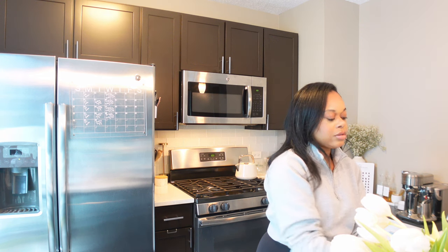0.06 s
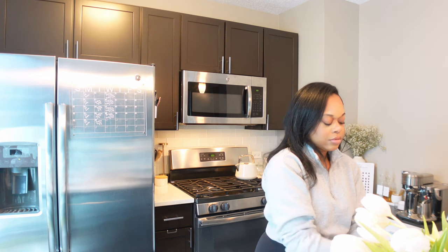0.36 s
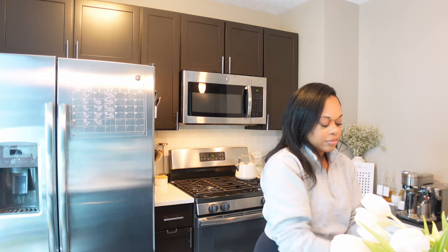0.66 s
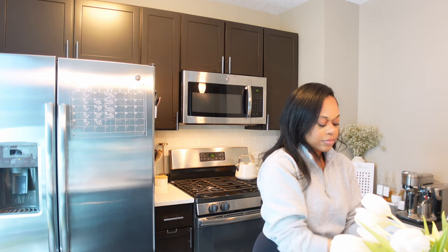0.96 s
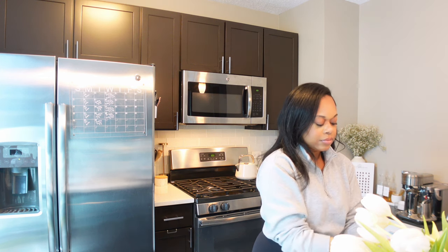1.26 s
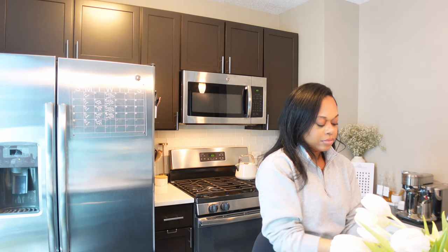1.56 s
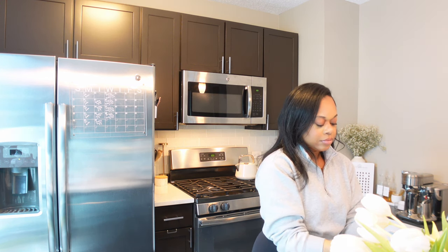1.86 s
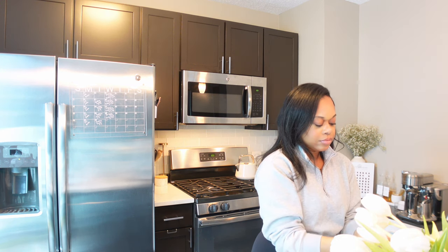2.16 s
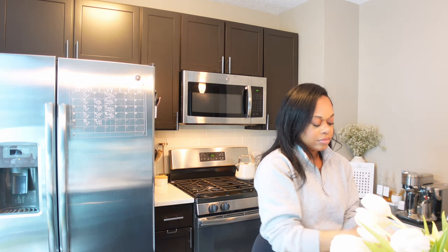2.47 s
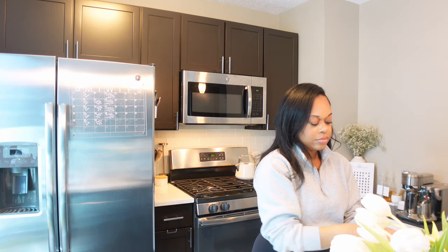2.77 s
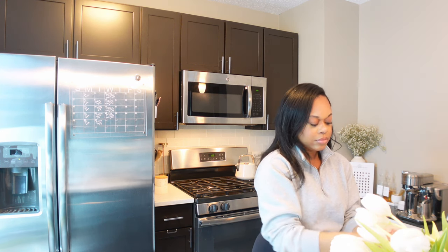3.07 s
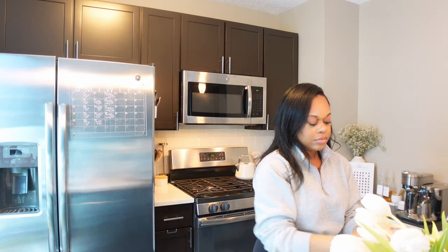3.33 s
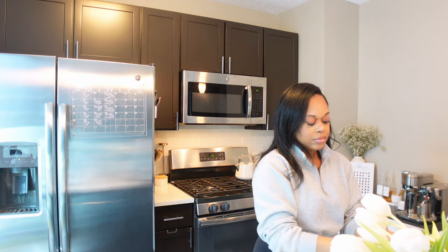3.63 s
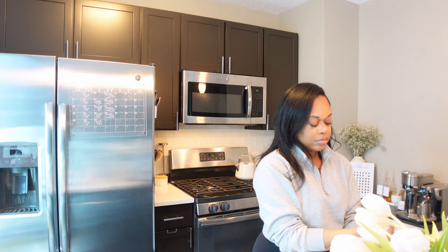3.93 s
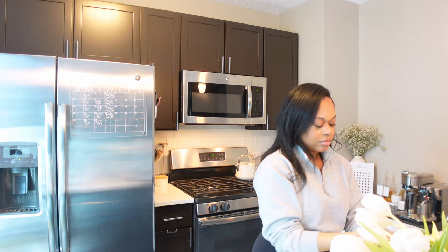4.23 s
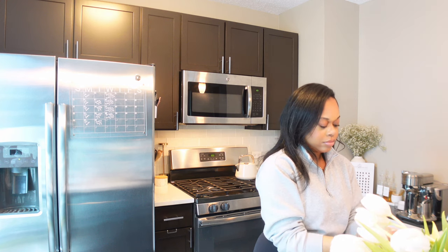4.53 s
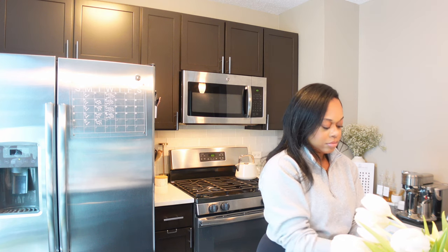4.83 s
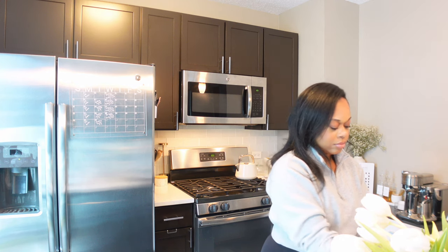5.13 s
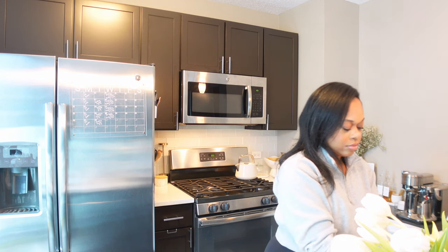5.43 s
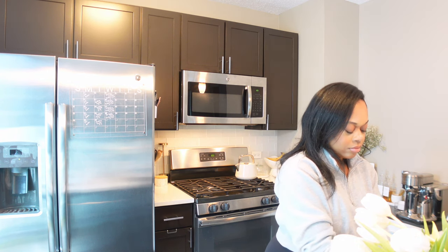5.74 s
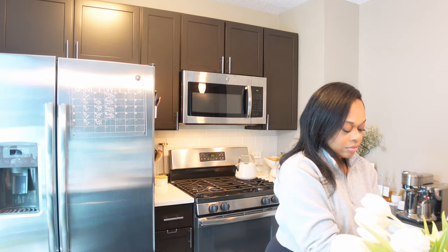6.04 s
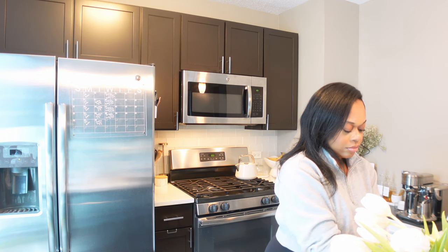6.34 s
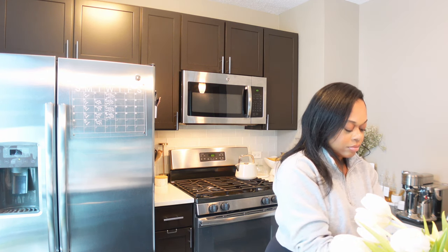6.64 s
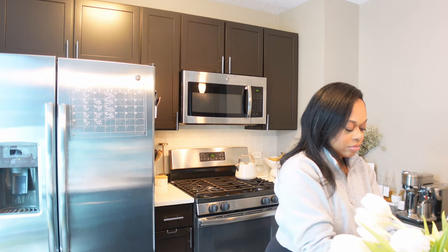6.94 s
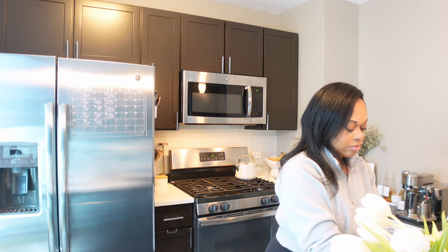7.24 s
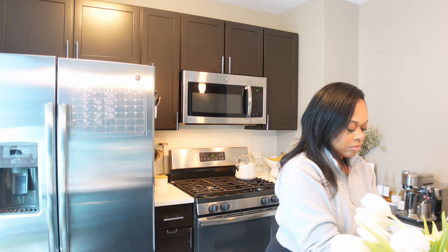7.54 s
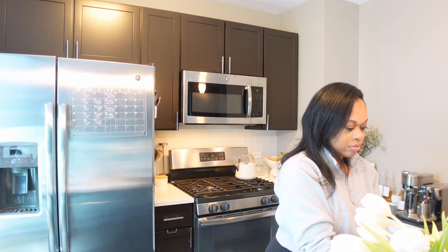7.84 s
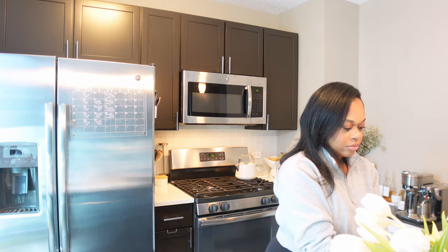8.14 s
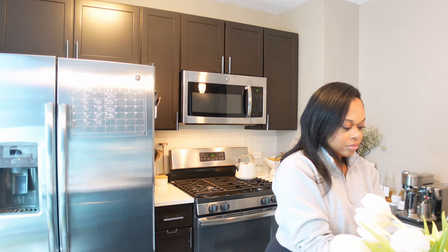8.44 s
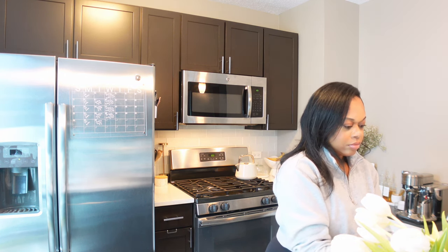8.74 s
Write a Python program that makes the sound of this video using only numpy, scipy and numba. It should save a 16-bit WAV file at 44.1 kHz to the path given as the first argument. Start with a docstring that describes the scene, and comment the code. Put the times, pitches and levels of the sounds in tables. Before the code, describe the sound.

A kitchen tap runs into a steel sink about a metre away, with an even hiss and bright, pattering spray. Hands are washed under the stream, so the water swells and dips, with small splashes, wet squelches, fizzing foam and plopping drops. In the second half the splashing turns fuller and lower and the stream drums on the basin floor. The small kitchen adds short echoes.

```python
"""Bright spray patters on a steel sink and sets it ringing: hands are being washed under a kitchen tap,
about a metre away. The spray swells and dips as the hands move, over the even hiss of the nozzle.
Run-off splashes in small bubbles, palms squelch, foam fizzes and big drops plop. The stream drums on
the basin floor, most of all near the end, and a small kitchen answers with short echoes."""
import sys
import numpy as np
from scipy import signal
from scipy.fft import rfft, irfft
from scipy.io import wavfile
from scipy.ndimage import uniform_filter1d
from numba import njit

SR = 44100
rng = np.random.default_rng(int(sys.argv[2]) if len(sys.argv) > 2 else 0)


def dump_mix(stems):
    """Bounce the given channels to the path in sys.argv[1] as a 16-bit WAV at rate SR."""
    frames = np.atleast_2d(stems).T  # one column per channel
    limited = np.clip(frames, -1, 1)  # hard clip at full scale
    pcm = np.round(limited * 32767).astype(np.int16)
    wavfile.write(sys.argv[1], SR, pcm)


N = 396755
T = np.arange(N) / SR

# Tone curves of the layers. Each row: frequency in Hz, gain in dB.
RUMBLE_EQ = [(20, -22), (45, -10), (65, 6), (120, 11), (300, -5), (1000, -32), (4000, -37)]
GURGLE_EQ = [(40, -35), (130, -6), (300, 1), (480, -1.5), (800, 1.5), (1300, -4), (2000, -1.5),
             (3500, -12.5)]
NOZZLE_EQ = [(1000, -22.5), (3000, -3), (6000, 0), (10000, 0), (16000, -2)]
MIST_EQ = [(6000, -24), (9500, -12), (12000, 1), (15500, -6)]
SPLASH_EQ = [(700, -21), (1400, -10.5), (2000, -7), (2800, 1), (4200, 7), (6000, 17.5), (10000, -6.5)]
SPRAY_EQ = [(300, -36), (1400, -30.5), (2200, -14.5), (3500, -8), (5200, -2.5), (7500, 2.5), (10500, 0),
            (13000, -2.5), (16000, -9.5)]
# Low modes of the basin floor and bright modes of the steel.
# Each row: frequency in Hz, bandwidth in Hz, relative level in dB.
BASIN_MODES = [(60, 8.1, -15), (98.2, 7.6, -17), (128, 11.6, -4), (160, 26, -3), (202, 17, 0),
               (223.6, 16.4, 3), (266.5, 21, -5), (360, 42, -10)]
STEEL_MODES = [(2810, 36, -3), (3250, 56, 7.5), (4003, 41, 6), (4490, 43, 2), (4800, 90, -5),
               (4995, 38, 5.5), (5530, 17, 8), (5814, 110, 2.5), (6270, 29, 4.5), (7000, 27, 4),
               (7750, 330, -3), (8650, 48, 0.5), (9400, 41, 3), (10500, 30, -1)]
# Water falling past the hands onto the basin floor. Each row: time in seconds, relative level in dB.
FALL_LEVELS = [(0.0, -43.5), (0.27, -42.5), (0.6, -50), (2.85, -51.5), (3.73, -50), (4.66, -53),
               (5.06, -49.5), (5.41, -42), (7.49, -43.5), (7.89, -45.5), (8.42, -39), (9.0, -42)]
# Thick ropes of water thudding on the basin floor.
# Each row: start in seconds, relative level in dB, nominal pitch in Hz, length in seconds.
THUDS = [(.045, -36, 216, 0.023), (.16, -33.5, 231, 0.011), (.33, -35, 220, 0.018), (5.121, -44, 82.5, 0.2),
         (5.24, -39, 213, 0.052), (5.527, -34.5, 198, .02), (5.7, -35.5, 212, 0.054),
         (6.83, -35, 187, 0.042), (7.97, -37, 200, 0.028), (8.24, -28.5, 210, 0.022),
         (8.42, -31.5, 213, 0.032)]
# Air squeezed out between wet palms.
# Each row: start in seconds, relative level in dB, centre pitch in Hz, length in seconds.
SQUELCHES = [(.172, -40, 1000, 0.027), (.335, -34, 713, 0.027), (1.03, -39.5, 1640, 0.03),
             (1.185, -38.5, 860, 0.054), (1.275, -37, 1520, 0.028), (1.34, -35, 954, 0.011),
             (1.972, -31.5, 740, 0.015), (1.985, -34.5, 1400, 0.019), (2.59, -46.5, 874, 0.072),
             (3.069, -40, 1540, 0.02), (3.517, -35.5, 1860, 0.029), (3.54, -48, 846, 0.034),
             (3.71, -38.5, 920, 0.021), (4.48, -38.5, 844, 0.032), (4.818, -36.5, 1810, 0.013),
             (6.124, -31.5, 1094, 0.01), (6.126, -30.5, 2110, 0.027), (6.131, -23.5, 3560, 0.023),
             (6.379, -40, 940, 0.014), (6.63, -42.5, 960, 0.03), (8.24, -44.5, 480, 0.066),
             (8.424, -42, 486, 0.079), (8.51, -41, 1080, 0.038)]
# Patches of bursting foam, and large drops plopping into the water.
# Each row: start in seconds, relative level in dB, centre pitch in Hz.
FIZZES = [(0.255, -30, 4670), (0.545, -27, 6650), (1.28, -27.5, 10100), (1.318, -27, 4860),
          (1.604, -27.5, 5060), (1.742, -26.5, 7300), (2.314, -25, 7400), (2.484, -35, 3480),
          (3.046, -28.5, 4680), (3.34, -32, 4530), (3.555, -31, 3900), (3.845, -23, 11600),
          (3.903, -32.5, 4900), (4.067, -32, 4750), (4.078, -23.5, 11100), (4.295, -29, 10100),
          (4.394, -33, 4170), (4.659, -25, 11600), (4.977, -29, 4650), (5.055, -27, 8200),
          (5.143, -29, 12900), (5.802, -29.5, 5100), (6.794, -31.5, 4420), (6.81, -28, 7260),
          (7.269, -30.5, 4840), (7.332, -28, 6850), (7.389, -28, 11700), (7.392, -31, 6340),
          (7.483, -27.5, 5750), (7.818, -29.5, 7700), (7.877, -26.5, 6640), (8.15, -27.5, 5100),
          (8.176, -41, 13800), (8.25, -31, 5200), (8.53, -31, 4700), (8.655, -25.5, 7100),
          (8.77, -31, 4940)]
PLOPS = [(.512, -36, 2930), (1.406, -29.5, 2940), (1.51, -28.5, 2520), (2.695, -27, 3130),
         (3.713, -29.5, 2560), (4.517, -36.5, 1920), (5.135, -29, 2820), (5.548, -31, 2760),
         (5.668, -36, 1820), (6.38, -34, 2380), (6.815, -34.5, 1860), (6.865, -38, 1600), (7.14, -33, 1363),
         (7.195, -42, 1210), (7.421, -40.5, 1380), (7.648, -27.5, 2960), (7.958, -29, 2000),
         (7.963, -25.5, 2640), (8.154, -27, 2590), (8.279, -24.5, 2550), (8.351, -29.5, 1870),
         (8.45, -28.5, 2940), (8.596, -32.5, 2180)]
# Water gathered in the cupped hands. Each row: time in seconds, fullness from 0 to 1.
CUPPED_WATER = [(0, 0.34), (.3, 0.24), (1.0, 0.47), (2.2, 0.12), (5.0, 0.3), (5.6, 0.52), (7.6, 0.56),
                (7.95, 0.93), (8.9, 0.45)]
# Hand strokes that shed water and throw up spray.
# Each row: middle in seconds, relative splash level in dB, spray lift in dB, length in seconds.
STROKES = [(0.192, -33, 0, 0.058), (.26, -38, 0, 0.05), (0.574, -37, 2, .1), (.75, -39, 0, 0.059),
           (0.884, -33.5, 0, 0.11), (1.04, -28, -0.5, 0.033), (1.4, -35, 0.5, .08), (1.74, -35, 2.5, .04),
           (2.24, -34, 1, 0.046), (2.495, -32.5, -2, 0.027), (2.682, -36, 2, .06),
           (2.878, -38.5, 2.5, 0.032), (3.042, -42, 1.5, 0.037), (3.125, -44, 4, 0.026),
           (3.413, -35, 1.5, 0.059), (3.57, -35, 1, 0.036), (3.723, -32, -0.5, .04),
           (4.095, -40, 0.5, 0.053), (4.843, -38.5, 2, 0.065), (5.118, -36.5, 3.5, 0.15),
           (5.588, -37, -0.5, .08), (5.873, -35.5, 3.5, 0.17), (6.097, -34.5, 3.5, 0.075),
           (6.146, -22.5, 0, 0.033), (6.39, -33.5, -1, 0.037), (6.667, -31.5, 4, 0.095),
           (6.937, -31, 1.5, .06), (7.024, -32, -1, 0.046), (7.122, -28.5, 1, 0.047),
           (7.716, -38, 4, 0.045), (7.898, -30.5, 2, 0.11), (7.985, -29.5, 1, 0.067),
           (8.128, -31.5, 0, .14), (8.31, -26.5, 0.5, 0.12), (8.456, -26, 2.5, 0.055),
           (8.57, -33.5, 4, 0.088), (8.794, -33, 0.5, 0.072)]
# The hands slip out of the stream. Each row: exit in seconds, return in seconds, spray dip in dB.
SLIPS = [(0, .158, 17), (0.616, 0.71, 4), (1.45, 1.555, 2.5), (1.78, 1.897, 3), (2.067, 2.138, 5),
         (2.497, 2.578, 5.5), (3.22, 3.3, 2.5), (3.95, 4.065, 3), (4.22, 4.292, 3), (4.41, 4.46, 2),
         (5.17, 5.513, 3), (6.16, 6.36, 2), (7.42, 7.613, 2.5), (7.985, 8.12, 2.5), (8.82, 8.971, 12)]
# Flung water slapping the steel. Each row: start in seconds, relative level in dB.
SLAPS = [(0.161, -26.5), (0.335, -28), (2.096, -39), (2.15, -28), (6.129, -40), (7.398, -36),
         (8.972, -21.5)]
# How hard the stream breaks into spray on the hands. Each row: time in seconds, relative level in dB.
SPRAY_LEVELS = [(0.2, -23), (0.34, -24.5), (5.01, -25), (5.23, -32), (6.69, -29.5), (8.7, -31.5),
                (8.8, -28)]

ROOM_T60_S, ROOM_SEND_DB, SIDE_SEND_DB = 0.3, -6, -12.5
FULL_SPRAY_DB = -24  # gurgle and mist follow the spray relative to this level


def undb(db):
    """Decibels to gain."""
    return 10 ** (np.asarray(db) / 20)


def automation(rows):
    """Join (time, value) points with straight lines."""
    return np.interp(T, *np.transpose(rows))


def eq(x, points):
    """Minimum-phase filter through (Hz, dB) points."""
    hz, db = np.transpose(points)
    grid_hz = np.maximum(np.fft.rfftfreq(4096, 1 / SR), 1)
    cepstrum = irfft(np.log(undb(np.interp(np.log(grid_hz), np.log(hz), db))))
    half = len(cepstrum) // 2
    causal = np.r_[cepstrum[0], 2 * cepstrum[1:half], np.zeros(half)]
    return signal.oaconvolve(x, irfft(np.exp(rfft(causal))))[:len(x)]


def unit_rms(x, band_hz=None):
    """Scale to rms 1, overall or within a band."""
    part = x
    if band_hz is not None:
        part = signal.sosfilt(signal.butter(4, band_hz, "band", fs=SR, output="sos"), x)
    return x / (np.std(part) + 1e-12)


def waver(rate):
    """Random drift with a spread near 1 and rate turns a second."""
    knots = rng.standard_normal(2048)
    return np.interp(T * rate, np.arange(len(knots)), knots)


def impacts(rate, spread_db):
    """Random drop impacts, rate a second: many small, a few large."""
    hit = rng.random(N) < rate / SR
    return hit * rng.choice([-1, 1], N) * undb(spread_db * np.minimum(rng.exponential(size=N), 5))


def burst(length_s, rate):
    """A flurry of drops that swells quickly and dies away."""
    age = T[:SR // 4] / length_s
    drops = (rng.random(len(age)) < rate / SR) * rng.standard_normal(len(age))
    return drops * (age + 0.07) * np.exp(-2.5 * age)


def place(track, x, start_s, db, length_s):
    """Mix in a sound with the energy of level db held for length_s."""
    start = int(np.clip(start_s * SR, 0, N - 1))
    x = x * undb(db) * np.sqrt(length_s * SR / (np.sum(x ** 2) + 1e-18))
    track[start:start + len(x)] += x[:N - start]


def ring(drops, modes):
    """Every impact strikes each resonance with a random strength of its own."""
    out = 0
    for hz, width_hz, db in modes:
        b, a = signal.iirpeak(hz, hz / width_hz, fs=SR)
        out = out + undb(db) * signal.lfilter(b, a, drops * rng.standard_normal(N))
    return out


@njit
def bubbles(starts, hz, cycles, sizes, rise, count):
    """Each bubble rings down to -60 dB and rises in pitch as it nears the surface."""
    out = np.zeros(count)
    for k in range(len(starts)):
        length, phase = int(cycles[k] * SR / hz[k]), 0.
        for i in range(min(length, count - starts[k])):
            phase += 2 * np.pi * hz[k] * (1 + rise * i / length) / SR
            out[starts[k] + i] += sizes[k] * np.exp(-np.log(1000) * i / length) * np.sin(phase)
    return out


def froth(drops, hz, octaves, cycles, rise):
    """Every drop traps a bubble; their pitches scatter around hz."""
    starts = np.flatnonzero(drops)
    detune, stretch = rng.standard_normal((len(starts), 2)).T
    centre_hz = np.broadcast_to(hz, len(drops))[starts]
    pitch_hz = np.clip(centre_hz * 2 ** (octaves * detune), SR / 400, SR / 3)
    return bubbles(starts, pitch_hz, cycles * np.exp(stretch / 2), drops[starts], rise, len(drops))


def soften(x, hz, q):
    """Bubbles form gradually, so little of their sound lies far from their pitch."""
    return signal.lfilter(*signal.iirpeak(hz, q, fs=SR), x)


def rumble():
    """A faint, steady bed of low noise."""
    return undb(-66.5) * unit_rms(eq(rng.standard_normal(N), RUMBLE_EQ))


def kitchen_echoes(x):
    """The kitchen's reverb: dense, short, favouring no one note, and weaker in the treble."""
    t = T[:SR // 2]
    arrived = t > .003  # pre-delay
    spectrum = rfft(rng.standard_normal(len(t)) * undb(-60 * t / ROOM_T60_S) * arrived, SR)
    flattened = spectrum / np.sqrt(uniform_filter1d(np.abs(spectrum) ** 2, size=50))
    tail = irfft(flattened, SR)[:len(t)] * arrived
    tone = [(100, -8.5), (250, -7), (500, -4.5), (1200, 2), (2500, -1.5), (5000, -1.5), (15000, -6.5)]
    return signal.oaconvolve(x, eq(tail / np.sqrt(np.sum(tail ** 2)), tone))[:N]


def side_echoes(x):
    """Echoes from the sides widen the sink, mostly in the low mids."""
    tone = [(60, 1), (110, 3), (200, -2), (320, 8), (550, 8.5), (1200, 4.5), (2000, -3.5),
            (3200, -1), (6500, -10), (13000, -3)]
    return eq(kitchen_echoes(x), tone)


def gurgle(feed_db):
    """The film on the basin floor gurgles more as more spray feeds it."""
    film = unit_rms(eq(impacts(rate=1800, spread_db=2), GURGLE_EQ))
    return film * undb(-44.5 + 0.51 * (feed_db - FULL_SPRAY_DB))


def basin_drum(fall_db):
    """The stream drums on the low modes of the basin floor; thick ropes of water land as thuds."""
    drum = unit_rms(ring(impacts(rate=500, spread_db=1.5), BASIN_MODES)) * undb(fall_db)
    for start_s, db, hz, length_s in THUDS:
        knock = froth(burst(length_s, rate=600), hz, octaves=.15, cycles=16, rise=.03)
        place(drum, soften(knock, hz, q=2.0), start_s, db, length_s)
    return eq(drum, [(25, -20), (45, -11), (62, -0.5), (330, 1), (700, 2), (2000, -48)])


def mist(spray_db):
    """The finest droplets scatter all round the sink when the stream hits hard."""
    ticks = unit_rms(eq(impacts(rate=16000, spread_db=2), MIST_EQ))
    return ticks * undb(-39.5 + 1.5 * (spray_db - FULL_SPRAY_DB))


def nozzle_hiss():
    """The tap's nozzle hisses evenly, whatever the hands do."""
    return undb(-35) * unit_rms(eq(impacts(rate=16000, spread_db=1.5), NOZZLE_EQ))


def hand_bubbles():
    """Squelches and fizzes are dense clouds of short bubbles; plops are clouds of nearly one size."""
    out = np.zeros(N)
    for start_s, db, hz, length_s in SQUELCHES:
        squelch = froth(burst(length_s, rate=3800), hz, octaves=0.34, cycles=22, rise=0.14)
        place(out, squelch, start_s, db, length_s)
    for start_s, db, hz in FIZZES:
        fizz = froth(burst(length_s=0.031, rate=7000), hz, octaves=0.189, cycles=36, rise=0.041)
        place(out, soften(fizz, hz, q=0.61), start_s, db, length_s=0.049)
    for start_s, db, hz in PLOPS:
        plop = froth(burst(length_s=.026, rate=1400), hz, octaves=.085, cycles=42, rise=.06)
        place(out, soften(plop, hz, q=1.7), start_s, db, length_s=0.016)
    return eq(out, [(40, -26), (150, -11), (350, -2)])  # small bubbles radiate little bass


def hand_slips():
    """The dip in dB while the hands are out of the stream: a gradual fade, then a snap back."""
    fade_curve, return_s = .85, .004
    dip_db = 0
    for leave_s, back_s, depth_db in SLIPS:
        away = np.clip((T - leave_s) / (back_s - leave_s), 0, 1) ** fade_curve
        dip_db = dip_db + depth_db * away * np.clip(1 - (T - back_s) / return_s, 0, 1)
    return dip_db


def hand_strokes():
    """Each stroke swells quickly and ebbs slowly, shedding splashes and lifting the spray."""
    attack_share = .3
    shed_power = lift_db = 0
    for middle_s, splash_db, peak_lift_db, length_s in STROKES:
        past_peak = (T - middle_s) / length_s + .5 - attack_share
        width = np.where(past_peak < 0, attack_share, 1 - attack_share)
        swell = 2 ** -np.minimum((past_peak / width) ** 2, 20)
        shed_power = shed_power + undb(splash_db) ** 2 * swell
        lift_db = lift_db + peak_lift_db * swell
    return shed_power, lift_db


def flow_levels(feed_db, cupped):
    """The stream divides into spray, splashes and falling water; the moving hands make each waver."""
    dip_db = hand_slips()
    shed_power, lift_db = hand_strokes()
    spray_db = feed_db - 1 + lift_db - dip_db + 0.33 * waver(rate=22)
    runoff_db = -40.5 + 6 * cupped - 0.82 * dip_db + 0.9 * waver(rate=22)  # runs on between strokes
    splash_db = 10 * np.log10(undb(runoff_db) ** 2 + shed_power) - 2.5
    fall_db = automation(FALL_LEVELS) + 0.65 + 1.1 * waver(rate=22)
    return spray_db, splash_db, fall_db


def splashes(splash_db, cupped):
    """Water leaving the hands bursts into bubbles; fuller hands make larger, lower ones."""
    drops = impacts(rate=3800, spread_db=2.5) * undb(2.87 * waver(rate=40))
    pitch_hz = 3650 * 2 ** (-.75 * cupped)
    bubbling = eq(froth(drops, pitch_hz, octaves=0.373, cycles=25.5, rise=0.095), SPLASH_EQ)
    return unit_rms(bubbling, band_hz=(2000, 3800)) * undb(splash_db)


def spray(spray_db):
    """Fine drops tick on the sink in uneven spurts; the harder they land, the more the steel rings."""
    drops = unit_rms(impacts(rate=12000, spread_db=3))
    drops *= undb(spray_db + 1.15 * waver(rate=45) + 1.13 * waver(rate=220))
    for start_s, db in SLAPS:
        place(drops, burst(length_s=0.02, rate=6400), start_s, db, length_s=0.024)
    steel_db = 3 + .5 * np.minimum(spray_db + 26, 0)
    patter = eq(drops * undb(1.5) + ring(drops, STEEL_MODES) * undb(steel_db), SPRAY_EQ)
    # the drop size wanders, so neighbouring bands swell at different moments
    spectrum = rfft(patter)
    octave = np.log2(np.fft.rfftfreq(N, 1 / SR) + 1)
    centres = np.log2(np.geomspace(3000, 14000, 7))
    bands = [irfft(spectrum * np.interp(octave, centres, weight), N) for weight in np.eye(len(centres))]
    return undb(1.88) * sum(band * undb(1.56 * waver(rate=26)) for band in bands)


def pan(x, balance_db):
    """Pan the highs by balance_db, left minus right; long bass waves reach both sides alike."""
    bass = signal.sosfiltfilt(signal.butter(2, 480, fs=SR, output="sos"), x)
    return bass + (x - bass) * undb(np.array([balance_db, -balance_db]) / 2)


def scene():
    """The sink sits a little to the right, more so as the hands fill; echoes and mist add width."""
    cupped, feed_db = automation(CUPPED_WATER), automation(SPRAY_LEVELS)
    spray_db, splash_db, fall_db = flow_levels(feed_db, cupped)
    water = spray(spray_db) + nozzle_hiss() + splashes(splash_db, cupped) + hand_bubbles()
    water += basin_drum(fall_db) + gurgle(feed_db)
    mid = water + kitchen_echoes(undb(ROOM_SEND_DB) * water)
    side = side_echoes(undb(SIDE_SEND_DB) * water) + mist(spray_db)
    panned = pan(mid + rumble(), balance_db=-1.32 - 1.5 * cupped)
    return undb(-0.25) * (panned + np.array([side, -side]))


def record(dry):
    """A steep high cut at 16 kHz."""
    return signal.sosfilt(signal.ellip(10, .2, 80, 16000, fs=SR, output="sos"), dry)


dry = scene()
out = record(dry)
dump_mix(out)
```